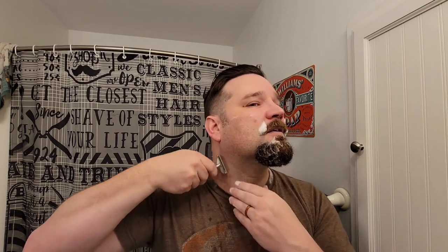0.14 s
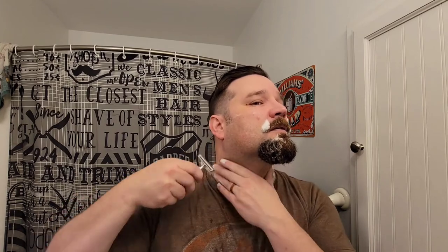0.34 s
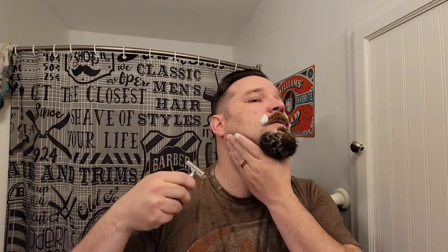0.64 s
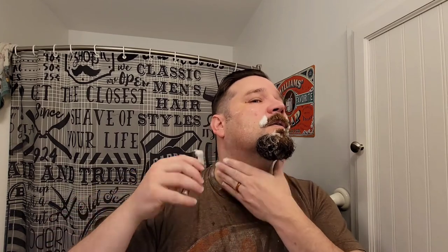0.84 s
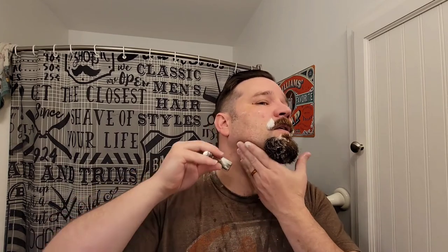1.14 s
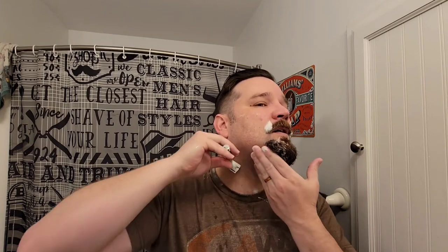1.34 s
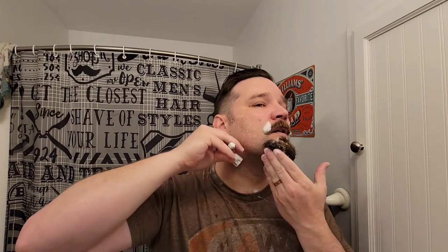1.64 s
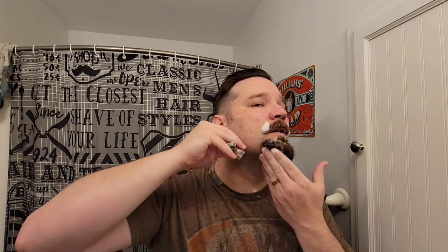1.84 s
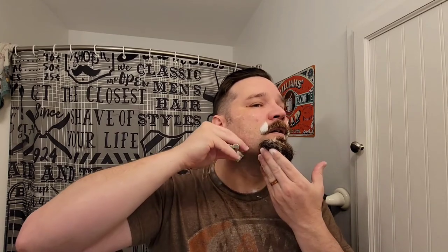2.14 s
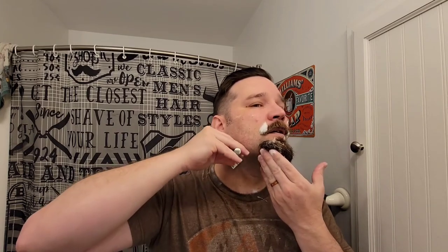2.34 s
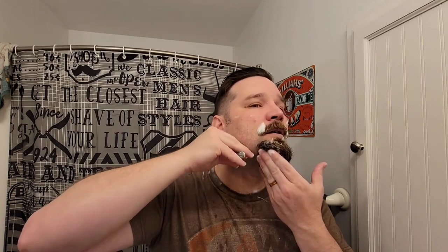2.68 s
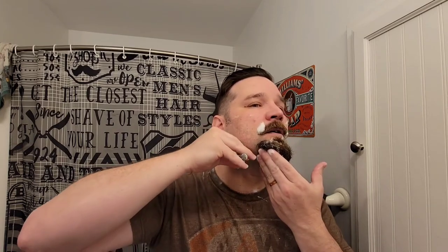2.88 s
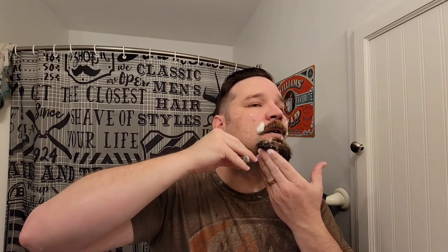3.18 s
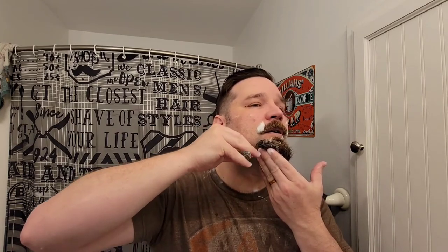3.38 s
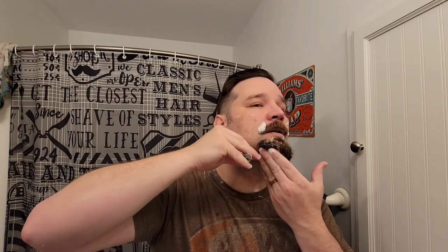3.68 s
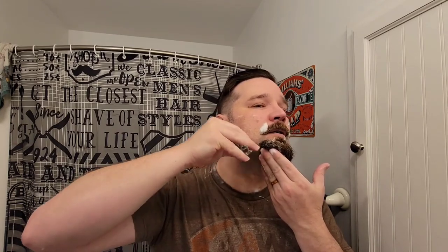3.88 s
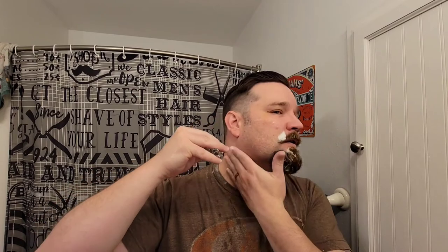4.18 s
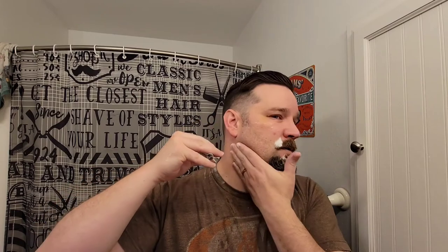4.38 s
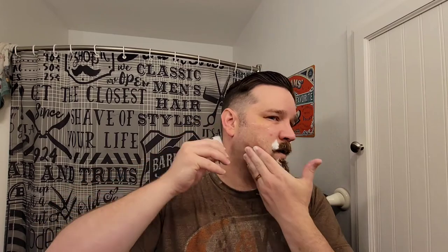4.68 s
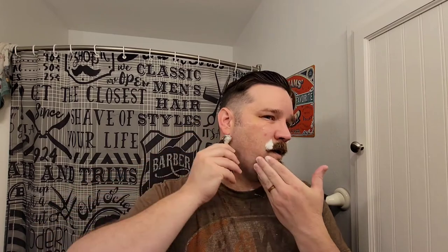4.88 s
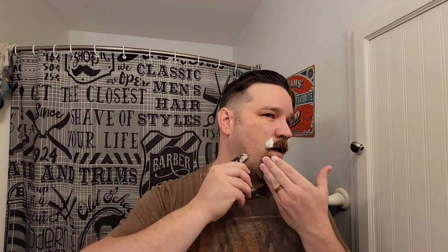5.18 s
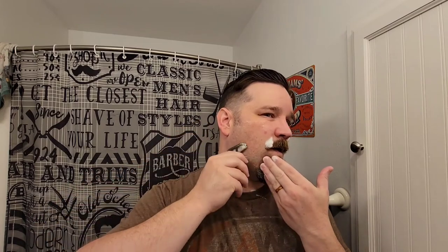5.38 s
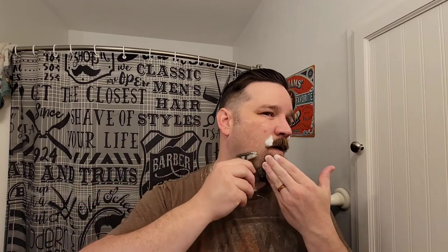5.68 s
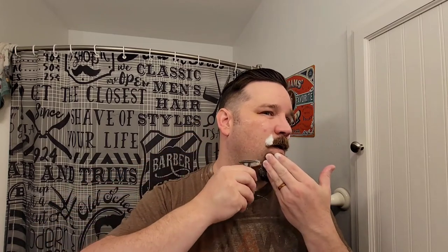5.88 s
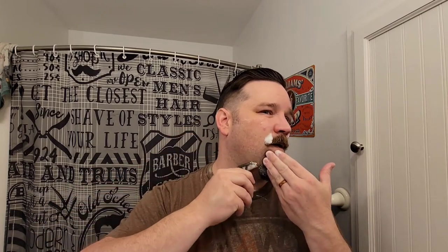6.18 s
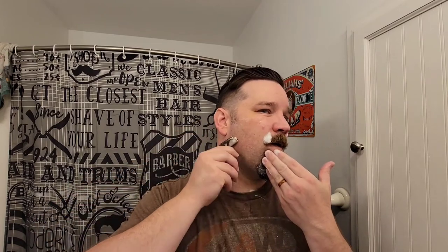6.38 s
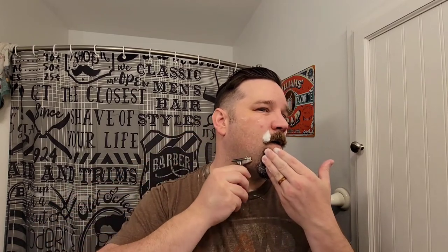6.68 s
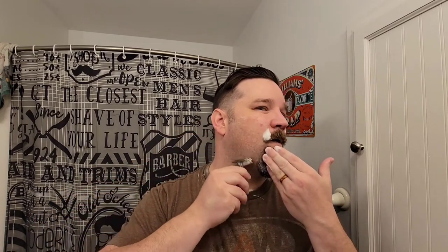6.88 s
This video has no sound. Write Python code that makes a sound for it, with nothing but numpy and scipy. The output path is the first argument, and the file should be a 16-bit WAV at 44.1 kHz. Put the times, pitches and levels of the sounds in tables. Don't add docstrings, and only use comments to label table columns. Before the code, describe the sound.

Short crisp razor scrapes on stubble, with soft skin rubs and small wet squeaks, over a steady low fan hum in a small bathroom.

```python
import sys
import numpy as np
from scipy import signal
from scipy.fft import rfft, irfft, next_fast_len
from scipy.io import wavfile
from scipy.ndimage import uniform_filter1d

SR = 44100
rng = np.random.default_rng(int(sys.argv[2]) if len(sys.argv) > 2 else 0)


def inscribe(sig):
    pcm = np.round(np.clip(np.atleast_2d(sig).T, -1, 1) * 32767)
    wavfile.write(sys.argv[1], SR, pcm.astype(np.int16))


def voltage_ratio(level):
    return 10 ** (np.asarray(level, float) / 20)


N = 310023


def evened(x):
    return x / np.sqrt(np.mean(x ** 2) + 1e-30)


def read(points, hz):
    point_hz, value = np.transpose(points)
    return np.interp(np.log(hz + 1), np.log(point_hz + 1), value)


def peaks_db(modes, hz):
    return sum(db / (1 + ((hz - mode_hz) / (width_hz / 2)) ** 2) for mode_hz, width_hz, db in modes)


def colour(x, gain):
    size = next_fast_len(N + SR // 4)
    return irfft(rfft(x, size) * gain(np.fft.rfftfreq(size, 1 / SR)), size)[..., :N]


def band(hz, lo_hz, hi_hz):
    return 1 / np.sqrt((1 + (lo_hz / (hz + 1)) ** 12) * (1 + (hz / hi_hz) ** 12))


def resonate(x, hz, width_hz):
    turn = np.exp(2j * np.pi * np.cumsum(hz * np.ones(N)) / SR)
    r = np.exp(-np.pi * width_hz / SR)
    return 2 * (turn * signal.lfilter([1 - r], [1, -r], x / turn)).real


def drift(rate_hz):
    return evened(colour(rng.standard_normal(N), lambda hz: 1 / (1 + (hz / rate_hz) ** 2)))


def snaps(per_s, spread_db):
    size = voltage_ratio(spread_db * np.minimum(rng.exponential(1, N), 4))
    size = size * rng.choice([-1., 1.], N)
    return size * (rng.random(N) < per_s / SR)


def shifting(x, depth_db, frames=8, bins=2):
    hz, _, z = signal.stft(x, SR, nperseg=512, noverlap=384)
    patches = uniform_filter1d(rng.standard_normal(z.shape), frames * 2, 1)
    patches = evened(uniform_filter1d(patches, bins, 0))
    gain_db = depth_db * patches / (1 + (hz[:, None] / 7000) ** 2)
    return signal.istft(z * voltage_ratio(gain_db), nperseg=512, noverlap=384)[1][:N]


def contact(rows, lift_db_per_s, bend=1):
    land_db_per_s, round_s, hop = 562, 0.014, 64
    t = np.arange(0, N + hop, hop) / SR
    start_s, length_s, end_db, swell_db = np.transpose(rows)[:, :, None]
    shape_db = end_db + swell_db * (np.clip((t - start_s) / length_s, 0, 1) ** bend - 1)
    shape_db = shape_db - land_db_per_s * np.maximum(start_s - t, 0)
    shape_db = shape_db - lift_db_per_s * np.maximum(t - start_s - length_s, 0)
    level_db = uniform_filter1d(np.maximum(shape_db.max(0), -115), round(round_s * SR / hop))
    return np.interp(np.arange(N) / SR, t, level_db)


def razor():
    # full_contact_s, length_s, rasp_end_db, swell_db, fizz_over_rasp_db (cut hairs)
    strokes = [(0.173, 0.031, -87, -10, -7), (1.581, 0.072, -77.5, 8, -4), (1.878, 0.049, -63.5, 11, 3.5),
               (2.19, 0.071, -65, 9, 6), (2.5, 0.065, -67.5, 1, -5.5), (2.801, 0.046, -65.5, 1.5, -3.5),
               (3.08, 0.071, -70, 0, -3.5), (3.363, 0.048, -67, 0, 1), (3.627, 0.044, -67, 4.5, 0),
               (3.889, 0.015, -61, 8.5, 5), (5.147, 0.13, -69.5, 5.5, 9), (5.592, 0.041, -67, 8.5, 5.5),
               (5.905, 0.067, -76, 8, 4.5), (6.198, 0.041, -71.5, 7.5, 8), (6.754, 0.078, -69, 10.5, 10)]
    # start_s, length_s, drag_db, swell_db
    slides = [
        (0.16, 0.053, -71, 7.5),
        (1.515, 0.1, -67, 16.5),
        (5.035, .14, -73.5, 4.5),
        (5.525, .075, -74, 1),
        (5.806, 0.088, -76, 12),
        (6.543, 0.24, -76, 3),
    ]
    # freq_hz, level_db_per_hz
    cut_spectrum = [(440, -83), (750, -14.5), (1170, -6.5), (1630, -12), (1900, -15), (2050, -3.5),
                    (2240, -12), (2580, -19), (2850, -10), (4810, -13), (7220, -4), (10700, -10),
                    (15700, 8.5)]
    # freq_hz, width_hz, boost_db
    head_modes = [(1043, 85, 4), (1629, 124, 7.5), (2057, 110, 4.5), (3100, 73, 1), (7490, 42, 3)]

    cuts = snaps(per_s=7000, spread_db=2.5) * voltage_ratio(1.3 * drift(rate_hz=28))
    cuts = shifting(cuts, depth_db=3.4)
    cuts = colour(cuts, lambda hz: voltage_ratio(read(cut_spectrum, hz) + peaks_db(head_modes, hz)))

    rasps, rings, drags, fizzes = [], [], [], []
    for s, n, db, up, over in strokes:
        rasps.append((s, n, db, up))
        rings.append((s, 0.9 * n, db - 4.5 - 0.44 * over, 0.66 * up))
        drags.append((s - 0.004, 0.81 * n, -65.5 + 0.74 * (db + 67) - 0.12 * over, 0.35 * up))
        fizzes.append((s, n, db + over, 1.7 * up))
    light_rasps = [(s, n, db - 5.5, up) for s, n, db, up in slides]
    rasp_db = contact(rasps + light_rasps, lift_db_per_s=249)
    ring_db = contact(rings, lift_db_per_s=277)
    drag_db = contact(drags + list(slides), lift_db_per_s=289)
    fizz_db = contact(fizzes, lift_db_per_s=352, bend=2.6)

    press_db = np.maximum(rasp_db, -95) + 78
    blade_hz, cheek_hz = 3730 + 26 * press_db, 1297 + 21 * press_db
    rasp = evened(colour(cuts, lambda hz: band(hz, 3440, 9500)))
    ring = colour(cuts, lambda hz: band(hz, 2140, 5740))
    ring = evened(ring + 0.5 * resonate(ring, blade_hz, width_hz=170))
    drag = colour(cuts, lambda hz: band(hz, 650, 2570))
    drag = evened(drag + 0.93 * resonate(drag, cheek_hz, width_hz=500))
    fizz = evened(colour(cuts, lambda hz: band(hz, 7200, 13800)))
    return voltage_ratio(rasp_db - 2.5) * rasp + voltage_ratio(ring_db) * ring + voltage_ratio(drag_db) * drag + voltage_ratio(fizz_db) * fizz


def rubbing():
    # time_s, hiss_db (pressure), hollow_over_hiss_db (cupping)
    rubs = [
        [(.33, -94.5, -11), (.42, -88.5, -4), (.52, -78.5, 1), (.6, -83, -9), (.71, -74, -3.5), (.77, -82, -2),
         (.83, -74.5, -2), (.89, -105, -5)],
        [(.96, -91, 3), (1.03, -80, -1.5), (1.1, -84.5, -8), (1.17, -73.5, -8), (1.255, -68, 6),
         (1.34, -71.5, 2), (1.43, -75, -2), (1.48, -78, -11), (1.58, -80.5, -12)],
        [(3.96, -83, -1), (4.02, -78, 2), (4.09, -96, 2), (4.2, -97.5, 6), (4.26, -86.5, 3), (4.33, -93, -2)],
        [(4.33, -85.5, 1), (4.47, -81, -7), (4.54, -82.5, -2), (4.6, -78, -5), (4.68, -81, 0),
         (4.73, -74.5, -3), (4.85, -64.5, -19), (4.93, -71.5, -10), (5.05, -88.5, 9)],
    ]
    # air_over_hiss_db, flesh_over_hiss_db
    skins = [
        (2, -3.5),
        (-5, -12),
        (2, -20),
        (-12, -23),
    ]
    rows = np.array([tuple(row) + tuple(skin) for rub, skin in zip(rubs, skins) for row in rub])
    t = np.arange(N) / SR
    gate = sum((t > rub[0][0]) & (t < rub[-1][0]) for rub in rubs)
    levels_db = [np.interp(t, rows[:, 0], column) for column in rows.T[1:]]
    return levels_db, uniform_filter1d(np.minimum(gate, 1.), 600)


def hand():
    # freq_hz, level_db_per_hz
    palm_spectrum = [(590, -51), (1000, -25), (1840, -13), (2240, -5), (2510, -15.5), (2600, -8),
                     (3510, -6), (3630, -10), (7690, 3), (11500, -6), (15700, 6)]
    slips = snaps(per_s=16000, spread_db=-11.5) * voltage_ratio(2.1 * drift(rate_hz=14))
    slips = shifting(slips, depth_db=3.2)
    slips = colour(slips, lambda hz: voltage_ratio(read(palm_spectrum, hz)))
    (hiss_db, cup_db, air_db, flesh_db), gate = rubbing()

    firm_db = uniform_filter1d(np.maximum(hiss_db + cup_db + 80, 0), 800)
    hiss_hz = 7150 - 69 * firm_db
    hollow_hz = np.minimum(2350 + 157 * firm_db, 3800)
    hiss = colour(slips, lambda hz: band(hz, 3400, 10400))
    hiss = evened(hiss + 0.31 * resonate(hiss, hiss_hz, width_hz=1700))
    hollow = colour(slips, lambda hz: band(hz, 2380, 4770))
    hollow = evened(hollow + 2.9 * resonate(hollow, hollow_hz, width_hz=490)) * voltage_ratio(cup_db)
    airy = evened(colour(slips, lambda hz: band(hz, 5900, 15000))) * voltage_ratio(air_db)
    flesh = evened(colour(slips, lambda hz: band(hz, 1200, 1580))) * voltage_ratio(flesh_db)
    return gate * voltage_ratio(hiss_db - 1.5) * (hiss + hollow + airy + flesh)


def squeaks():
    # start_s, length_s, level_db, start_hz, end_hz
    whistles = [
        (0.688, 0.064, -67.5, 2490, 2350),
        (1.035, 0.038, -80, 2260, 2220),
        (1.102, 0.095, -75, 2480, 2110),
    ]
    width_hz = 120
    t, noise = np.arange(N) / SR, rng.standard_normal(N)
    start_s, length_s, level_db, from_hz, to_hz = np.transpose(whistles)
    ends_s = np.ravel([start_s, start_s + length_s], "F")
    hz = np.interp(t, ends_s, np.ravel([from_hz, to_hz], "F"))
    arches = sum(voltage_ratio(db) * np.sin(np.pi * np.clip((t - s) / n, 0, 1))
                 for s, n, db in zip(start_s, length_s, level_db))
    return arches * evened(resonate(resonate(noise, hz, width_hz), hz, width_hz))


def ticks():
    # time_s, peak_db, centre_hz, width_octaves, knock_under_peak_db
    bursts = [
        (0.515, -59, 5000, 1.6, -7),
        (0.9279, -54, 2260, 2.4, -8),
        (0.931, -66.5, 4400, 1.1, -7),
        (0.9394, -62, 4330, 1, -16),
        (4.266, -59.5, 2800, 0.65, -6),
        (4.368, -68, 4000, 0.71, -14),
        (5.01, -55.5, 2090, 1.2, -1),
        (5.386, -67.5, 7860, 0.43, -16),
        (5.453, -64, 3500, 1.1, -11),
        (6.707, -67, 7500, .6, -18),
    ]
    tick_s, knock_hz, knock_s = 0.0041, 404, 0.0081
    out, t = np.zeros(N + 4000), np.arange(2000) / SR
    knock = sum(np.sin(2 * np.pi * knock_hz * ratio * t) * np.exp(-t * ratio / knock_s)
                for ratio in (1, 1.3, 1.7, 2.6))
    for s, db, hz, octaves, knock_db in bursts:
        half = 2 ** (octaves / 2)
        edges_hz = [hz / half, min(hz * half, 15000)]
        sos = signal.butter(2, edges_hz, "band", fs=SR, output="sos")
        burst = signal.sosfilt(sos, rng.standard_normal(2000)) * np.exp(-t / tick_s)
        burst = burst / abs(burst).max()
        out[round(s * SR):][:2000] += voltage_ratio(db) * (burst + voltage_ratio(knock_db) * knock / 2)
    return out[:N]


def motor():
    # magnet_multiple, shaft_turns_added, left_db, right_db
    tones = [(0, 5, -61.1, -60.9), (1, -2, -73.7, -75.4), (1, -1, -60.4, -61.2), (1, 0, -52.2, -51.6),
             (1, 1, -67.2, -70.9), (2, -1, -72.4, -70.0), (2, 0, -63.9, -59.6), (2, 1, -76.4, -74.6),
             (3, -2, -85.2, -88.0), (3, -1, -70.8, -74.5), (3, 0, -71.5, -67.6), (3, 1, -83.1, -81.2),
             (4, -1, -82.9, -94.2), (4, 0, -90.5, -82.8), (4, 1, -87.1, -91.4), (5, -1, -84.6, -91.1),
             (5, 0, -90.9, -89.2), (6, 1, -91.5, -91.8)]
    magnet_hz, shaft_hz, shaft_start_rad = 119.967, 14.74, 3.6
    t, out = np.arange(N) / SR, np.zeros((2, N))
    shaft = 2 * np.pi * shaft_hz * t + shaft_start_rad + 0.53 * drift(rate_hz=1.0)
    gusts = voltage_ratio(2.2 * drift(rate_hz=1.5))
    for k, m, *side_db in tones:
        phase = 2 * np.pi * k * magnet_hz * t + m * shaft
        phase -= np.pi / 2 * (k > 1 and m != 0)
        tone = voltage_ratio(side_db)[:, None] * np.cos(phase + np.array([[.15], [-.15]]))
        out += np.sqrt(2) * tone * (gusts if k == 0 else 1)
    return out


def excess_db(near, window_s, from_db):
    power = abs(uniform_filter1d(near ** 2, round(window_s * SR)))
    return np.maximum(10 * np.log10(power + 1e-14) - from_db, 0)


def fan_air(near):
    # freq_hz, level_db_per_hz
    rumble_spectrum = [(15, -93.5), (32, -95.5), (58, -80), (110, -79.5), (150, -85.5), (185, -99),
                       (225, -86.5), (280, -99), (318, -94.5), (375, -91), (425, -100.5), (500, -99),
                       (620, -104), (680, -110)]
    # freq_hz, level_db_per_hz
    hiss_spectrum = [(680, -110), (840, -110), (1200, -115), (1900, -122), (2400, -119), (3000, -123),
                     (5500, -130), (7800, -126), (8500, -132), (11000, -132), (13000, -129), (15700, -129)]
    # freq_hz, width_hz, boost_db
    duct_modes = [(197.5, 2.1, 10), (318.2, 10, 11.5), (478, 8, 4), (526, 2.9, 4.5), (665, 9.2, -15.5),
                  (836, 26, 9)]
    # time_s, level_db
    whine_levels = [(0, -84.5), (.35, -86.5), (.9, -85.5), (1.5, -87.5), (2.07, -82), (2.4, -87),
                    (3.55, -88), (3.75, -81), (4.3, -87.5), (5.45, -83.5), (5.87, -81), (6.1, -84),
                    (6.4, -88), (6.55, -84), (7.03, -89)]
    split_hz, whine_hz, whine_width_hz = 680, 2317, 9
    t = np.arange(N) / SR
    noise = rng.standard_normal((2, 2, N)) * np.sqrt(SR / 2)
    rumble = colour(noise[0], lambda hz: voltage_ratio(read(rumble_spectrum, hz) + peaks_db(duct_modes, hz)) * (hz < split_hz))
    hiss = colour(noise[1], lambda hz: voltage_ratio(read(hiss_spectrum, hz) + peaks_db(duct_modes, hz)) * (hz >= split_hz))
    open_db = 0.033 * excess_db(near, 0.094, -85) + 0.52 * t - 2.5

    turns = np.cumsum(whine_hz + whine_width_hz * drift(rate_hz=14)) / SR
    whine = np.sqrt(2) * np.cos(2 * np.pi * turns + np.array([[0], [1.2]]))
    whine = whine * voltage_ratio(2.6 * drift(rate_hz=11))
    whine_db = np.interp(t, *np.transpose(whine_levels))
    whine_db = whine_db - 0.096 * excess_db(near, 0.053, -90)
    return rumble + hiss * voltage_ratio(open_db) + whine * voltage_ratio(whine_db)


def bathroom(x, wet_db):
    # freq_hz, t60_s
    decay = [(500, 0.21), (2000, 0.072), (6000, 0.08), (14000, 0.12)]
    taps = np.zeros((2, SR // 2))
    at = np.arange(60, SR // 2 - 20, 20)
    at = at + rng.integers(0, 20, (2, len(at)))
    np.put_along_axis(taps, at, rng.choice([-1., 1.], at.shape), 1)
    hz, t, z = signal.stft(taps, SR, nperseg=256)
    tail = signal.istft(z * voltage_ratio(-60 * t / read(decay, hz)[:, None]), SR, nperseg=256)[1]
    tail = voltage_ratio(wet_db) * tail / np.linalg.norm(tail[0])
    tail[0, 0], tail[1, 25] = 1, .25
    tail = tail / np.linalg.norm(tail, axis=1, keepdims=True)
    return signal.fftconvolve(x[None], tail, axes=1)[:, :N]


def scene():
    # freq_hz, side_over_mid_db
    width = [(60, -17), (110, -8.5), (200, -1.5), (380, -4), (700, 8), (1290, 4), (2380, -0.5), (4400, 3.5),
             (7400, -0.5), (7800, -13.5), (15000, -11)]
    near = razor() + hand()
    mid, side = bathroom(near + ticks() + squeaks(), wet_db=2.0) + fan_air(near)
    side = colour(side, lambda hz: voltage_ratio(read(width, hz))) + 0.088 * mid
    return np.array([mid + side, mid - side]) + motor()


def band_limit(x):
    return signal.sosfilt(signal.butter(12, 16300, fs=SR, output="sos"), x)


def record(dry):
    mix = colour(dry, lambda hz: hz < 15760)
    return band_limit(mix)


dry = scene()
out = record(dry)
inscribe(out)
```